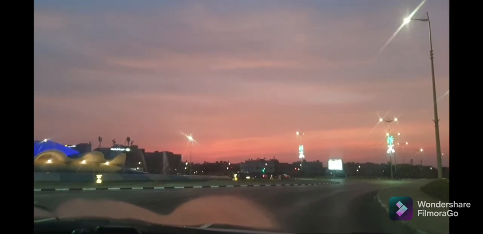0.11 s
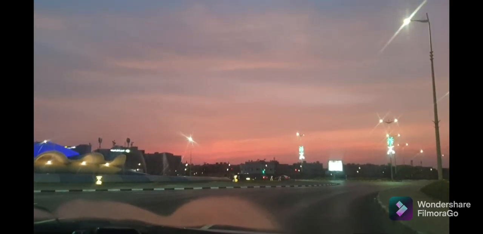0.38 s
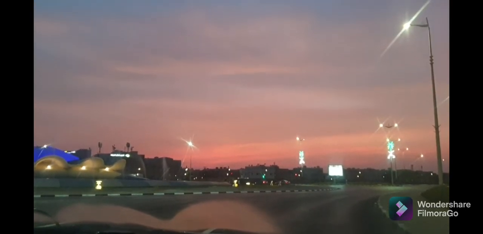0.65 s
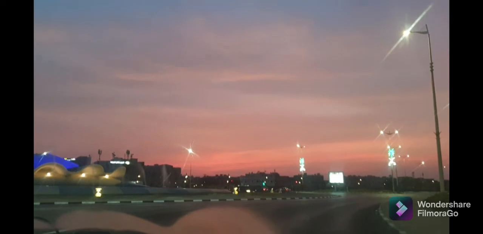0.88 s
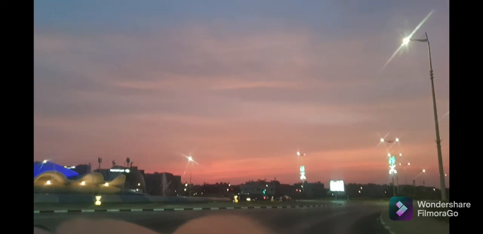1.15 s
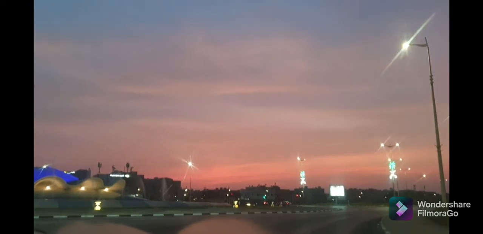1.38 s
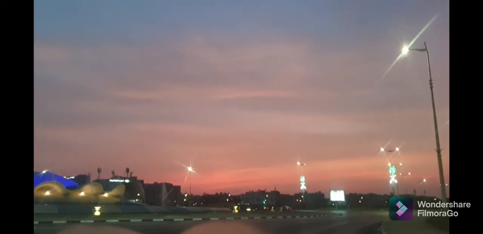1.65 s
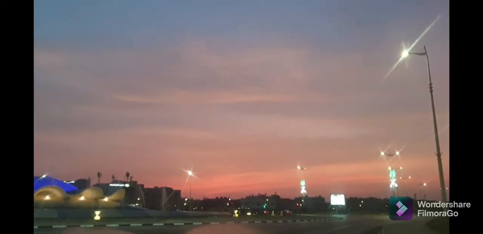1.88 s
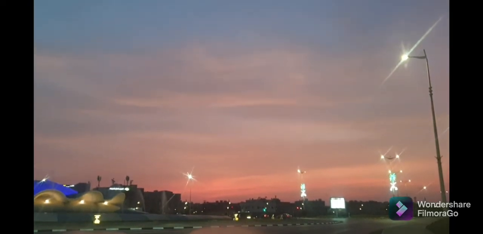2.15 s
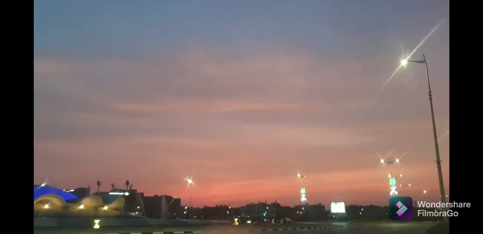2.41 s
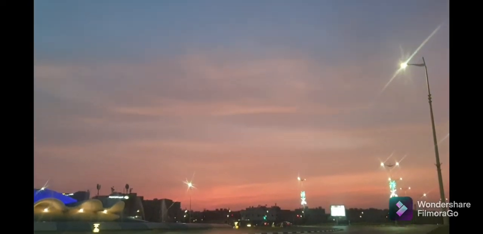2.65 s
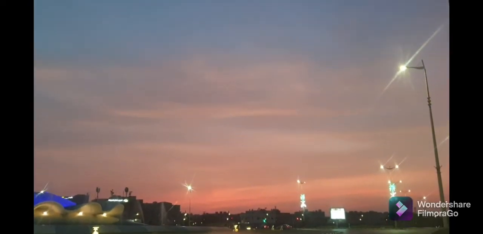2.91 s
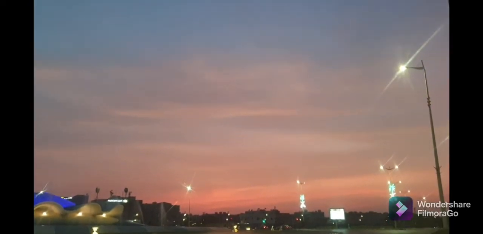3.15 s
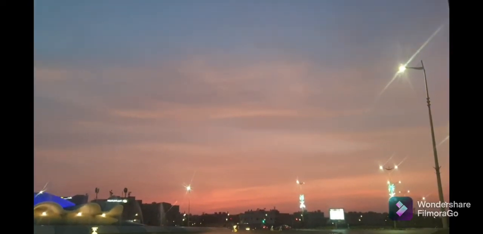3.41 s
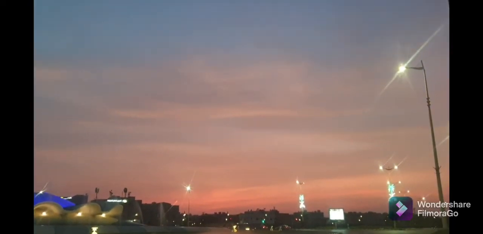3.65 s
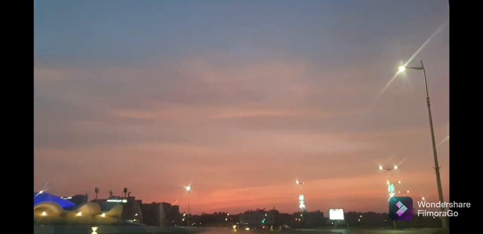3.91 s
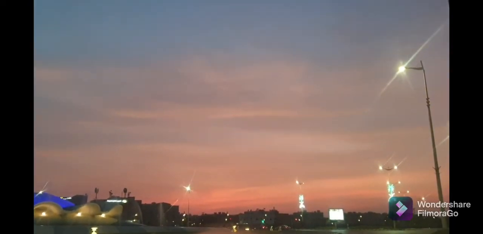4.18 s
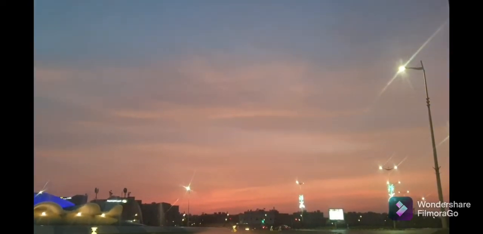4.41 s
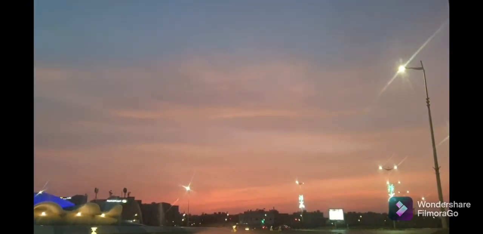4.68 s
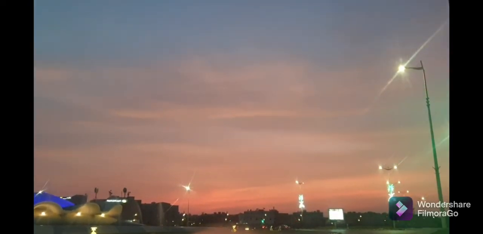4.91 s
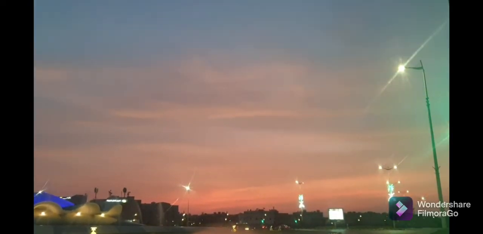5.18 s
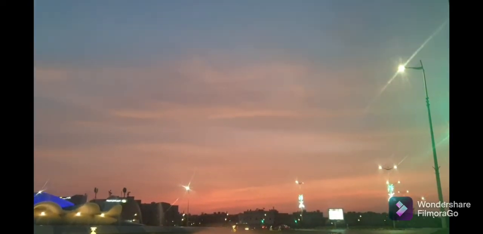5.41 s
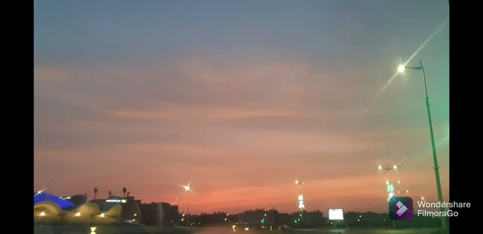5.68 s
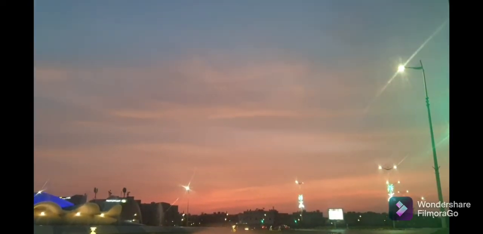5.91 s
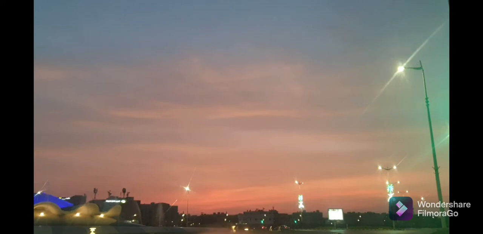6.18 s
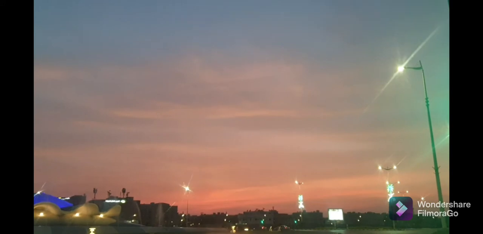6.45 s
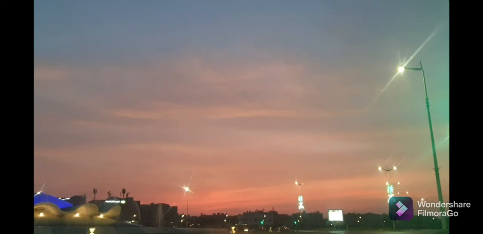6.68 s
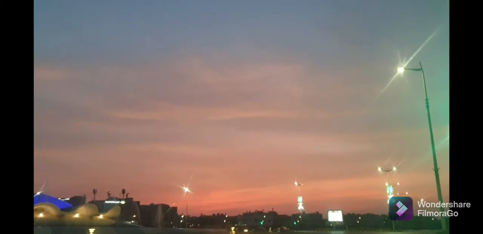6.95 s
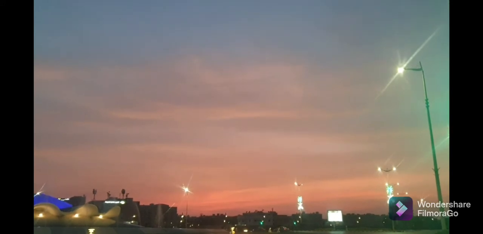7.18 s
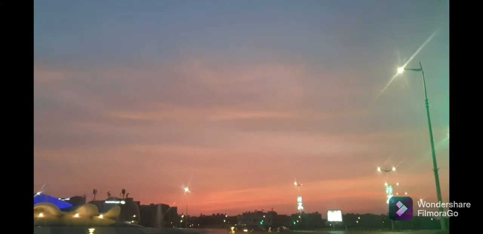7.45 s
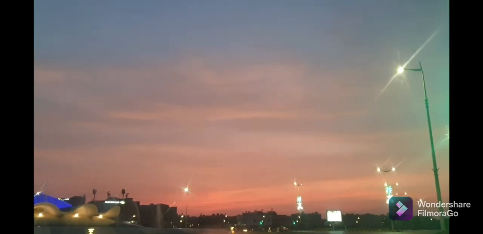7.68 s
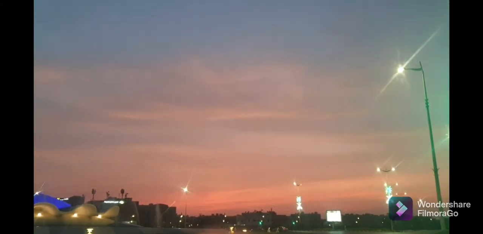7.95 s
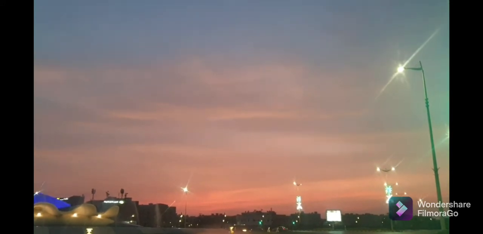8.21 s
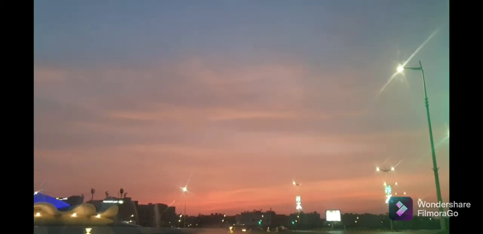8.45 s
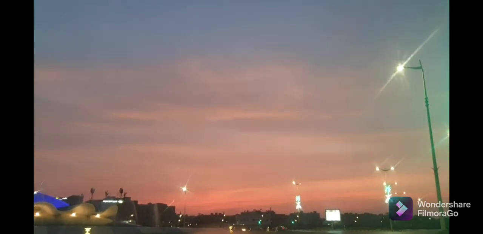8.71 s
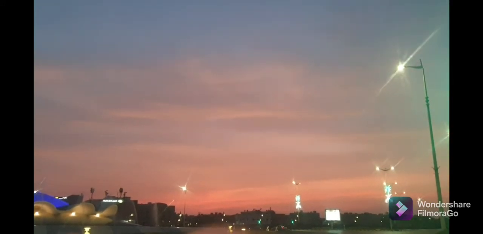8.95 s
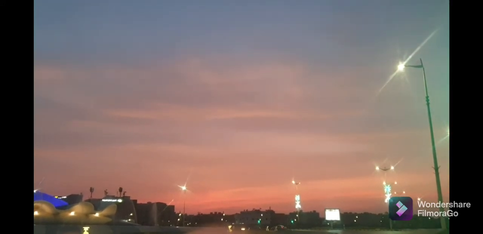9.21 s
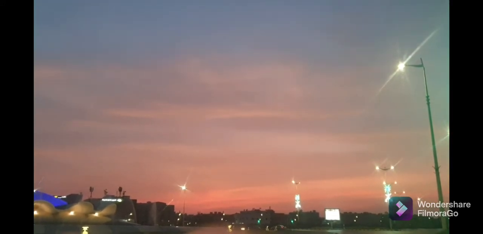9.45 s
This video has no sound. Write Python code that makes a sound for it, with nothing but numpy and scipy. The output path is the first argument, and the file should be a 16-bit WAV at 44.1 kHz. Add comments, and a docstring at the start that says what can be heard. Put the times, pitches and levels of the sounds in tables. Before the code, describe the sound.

Outdoor birdsong over low traffic wash and faint leaf hiss. Short loud buzzing chirps come first, followed by sparse, echoing far whistles and tiny twitter. Midway a distant rattle and mellow fluting lead into a close, fast, bright trill ending in a rising burr. After a lull, soft slurred whistles and stepping falling notes gather as the road swells again. Slightly gritty microphone, strong on the right, muffled and late on the left.

```python
"""Dawn chorus: over road noise, far chorus and leaf hiss, a thrush flutes and a near finch churrs, ticks and buzzes.
Whistles, seeps and twitter follow; the road swells near 4 s as a far finch rattles and the thrush returns.
The near finch trills from 4.5 s, then ticks and buzzes again; pips, warbler steps and a second road swell close.
Birds are warbled, gliding sines with noise-tail echoes; road, chorus and hiss are coloured noise.
The right microphone is open, the left one covered: faint, dull and late."""
import sys
import numpy as np
from scipy import signal
from scipy.fft import rfft, irfft, next_fast_len
from scipy.io import wavfile
from scipy.ndimage import uniform_filter1d

SR = 44100
rng = np.random.default_rng(int(sys.argv[2]) if len(sys.argv) > 2 else 0)


def persist_wave(psi):
    """Save psi, clipped to +-1, as 16-bit WAV."""
    counts = np.round(np.clip(psi, -1, 1) * 32767).astype(np.int16)
    wavfile.write(sys.argv[1], SR, np.atleast_2d(counts).T)


def magnitude_from_level(level_db):
    """Linear magnitude for a level in decibels (20 dB per decade)."""
    exponent = np.asarray(level_db, float) / 20
    return 10 ** exponent


N = 422919


def in_time(rows):
    """Columns of a table as curves, one value a sample."""
    s, *columns = np.transpose(rows)
    return [np.interp(np.arange(N) / SR, s, column) for column in columns]


def on_bins(points, size):
    """A table of frequency_hz, level_db as gains on the bins of a transform."""
    bin_hz = np.fft.rfftfreq(size, 1 / SR)
    hz, db = np.transpose(points)
    return magnitude_from_level(np.interp(np.log(bin_hz + 1), np.log(hz), db))


def drift(rate_hz, size):
    """Random wander of spread 1: noise smoothed by a one-pole lowpass at rate_hz."""
    knot_hz = 400
    knots = rng.standard_normal(int(size / SR * knot_hz) + 2)
    r = np.exp(-2 * np.pi * rate_hz / knot_hz)
    start = [r * rng.standard_normal()]
    slow = signal.lfilter([np.sqrt(1 - r * r)], [1, -r], knots, zi=start)[0]
    return np.interp(np.arange(size) * knot_hz / SR, np.arange(len(knots)), slow)


def coloured(spectrum):
    """Noise of a given spectrum, rms 1."""
    white = rng.standard_normal(N + 1)
    noise = irfft(rfft(white) * on_bins(spectrum, N + 1))[:N]
    return noise / np.std(noise)


def add_note(out, rows, warble_hz, overtone_db, flutter_db, edge_s):
    """One note: a gliding sine, warbled in pitch, with weak overtones; air and leaves make its level flutter."""
    s, hz, db, depth_hz = np.transpose(rows)
    t = np.arange(s[0], min(s[-1], (N - 1) / SR), 1 / SR)
    rate_hz = warble_hz * (1 + 0.076 * drift(65, len(t)))
    warble = np.sin(2 * np.pi * np.cumsum(rate_hz) / SR + rng.uniform(0, 2 * np.pi))
    depth_hz = np.interp(t, s, depth_hz)
    buzz = np.minimum(depth_hz / 450, 1)
    phase = 2 * np.pi * np.cumsum(np.interp(t, s, hz) + depth_hz * warble) / SR
    # the throat passes the top of each warble best
    throb = 1 + .52 * buzz * warble
    # air currents roughen the level, quickly in a buzz
    flutter = flutter_db * drift(50, len(t)) + 2.8 * buzz * drift(170, len(t))
    edges = np.clip(np.minimum(t - s[0], s[-1] - t) / edge_s, 0, 1)
    level = magnitude_from_level(np.interp(t, s, db) + flutter) * throb * edges
    # octave, a tone at 1.5 times the pitch in a buzz, and a trace of the third harmonic
    overtones = np.sin(2 * phase) + 0.94 * buzz * np.sin(3 * phase / 2) + 0.03 * np.sin(3 * phase)
    note = level * (np.sin(phase) + magnitude_from_level(overtone_db) * overtones)
    at = round(s[0] * SR)
    out[at:at + len(t)] += note[:N - at]


def sing(parts, flutter_db):
    """Each syllable is its shape, stretched and shifted in pitch, with a small chance shift."""
    out = np.zeros(N)
    for shape, sung, warble_hz in parts:
        shape = np.array([(*point, 0)[:4] for point in shape])   # a plain shape has no warble
        for s, db, pitch, length in sung:
            chance = 1 + .006 * rng.standard_normal()
            rows = shape * [length, pitch * chance, 1, 1] + [s, 0, db, 0]
            add_note(out, rows, warble_hz, overtone_db=-30, flutter_db=flutter_db, edge_s=.003)
    return out


def glide(s, span, from_hz, to_hz, db, peak_at=.35, done=.45, start_db=0, end_db=-3.5):
    """Three points of a note: start, peak, end; peak_at is a share of length, done a share of the glide."""
    peak_hz = from_hz + done * (to_hz - from_hz)
    return [(s, from_hz, db + start_db), (s + peak_at * span, peak_hz, db), (s + span, to_hz, db + end_db)]


# swells of the background: time_s, road_db, chorus_db (both before a fixed lift or flutter)
BACKGROUND = [(0.0, -71.5, -51), (0.77, -71.5, -58.5), (1.44, -72.5, -66.5), (3.12, -66.5, -66.5),
              (3.98, -55.5, -54), (5.58, -70, -55), (7.64, -71.5, -74), (8.49, -65.5, -55.5),
              (9.59, -60.5, -50.5)]


def background_swells():
    """Level curves of the road and of the far chorus."""
    return in_time(BACKGROUND)


# road spectrum: frequency_hz, relative density_db (per Hz)
ROAD = [(24, -61), (40, -32), (252, 3), (353, 3), (592, -8.5), (776, -12), (1040, 2.5), (1990, -2),
        (2330, -4), (2610, -8.5), (3420, -10), (4000, -29), (4890, -8.5), (6700, -40), (8580, -28),
        (11200, -41), (18900, -120)]


def road_noise(level_db):
    """Distant road: coloured noise that follows a level curve."""
    return magnitude_from_level(level_db) * coloured(ROAD)


# spectrum of the blurred far birds: frequency_hz, relative density_db (per Hz)
CHORUS = [(1800, -14.5), (2500, 3), (4000, 10), (6000, -10), (8000, -20), (9000, -9)]


def far_chorus(level_db):
    """Far birds blurred into coloured noise whose level flutters."""
    return magnitude_from_level(level_db + 1.78 * drift(19.0, N)) * coloured(CHORUS)


# leaf hiss spectrum: frequency_hz, relative density_db (per Hz)
AIR = [(1500, -8), (4000, 3.5), (9000, -2), (12000, 6), (16000, -16)]


def leaf_hiss(road_db):
    """Hiss of leaves: coloured noise that swells by a share of the road's swing."""
    return magnitude_from_level(-74.5 + 0.44 * (road_db - road_db.mean())) * coloured(AIR)


# short thrush notes: start_s, length_s, from_hz, to_hz, peak_db, warble_depth_hz
FLUTE_NOTES = [(0, 0.017, 3174, 2820, -26.5, 263), (.04, 0.069, 2610, 2405, -42, 30),
               (0.248, 0.059, 2656, 2087, -43, 29.5), (1.382, .1, 2386, 2934, -55.5, 180),
               (9.141, .2, 2863, 3140, -46.5, 45)]
# long thrush phrases, each a list of points: time_s, pitch_hz, level_db, warble_depth_hz
FLUTING = [
    [(3.88, 1960, -51, 29.8), (3.95, 1864, -43.5, 60.6), (4.01, 1742, -43.5, 60), (4.06, 1912, -42, 29.8),
     (4.2, 2043, -34.5, 29.6), (4.33, 2079, -42.5, 29.8), (4.355, 2228, -37.5, 30),
     (4.38, 1835, -41.5, 246), (4.46, 1686, -40, 190)],
    [(4.7, 2995, -39.5, 25), (4.78, 2910, -35.5, 25), (4.87, 2849, -40, 25), (4.91, 2622, -35, 210),
     (5.03, 2410, -45, 110)],
    [(8.61, 4700, -52, 16), (8.63, 3870, -49, 24), (8.67, 3380, -46.5, 17), (8.75, 3156, -47, 20),
     (8.82, 3506, -41.5, 30), (8.86, 4050, -42, 360), (8.96, 4870, -43, 176)],
]


def thrush():
    """Fluted sines; notes that start near 3 kHz warble fast as a burr, the others wobble more slowly."""
    out = np.zeros(N)
    short = [[(*point, depth_hz) for point in glide(*row)] for *row, depth_hz in FLUTE_NOTES]
    for note in short + FLUTING:
        warble_hz = 190 if 2600 < note[0][1] < 3200 else 40
        add_note(out, note, warble_hz, overtone_db=-40, flutter_db=1.8, edge_s=.006)
    return out


# near finch syllable shapes, before each is scaled and placed: time_s, pitch_hz, relative level_db
SLUR = [(0, 6290, -32), (.008, 5595, -1), (.018, 4816, 7), (.028, 4500, -13), (.033, 4540, -41)]
SPIKE = [(0, 3940, -5.5), (.0065, 4150, -7), (.0105, 5010, -12), (.0145, 3500, -5), (.017, 2820, -20)]
DROP = [(0, 4015, -5), (.006, 3687, 3.5), (.016, 3240, -5), (.022, 3200, -48)]
VEE = [(0, 4160, 0), (.004, 4200, -9), (.011, 4070, 2), (0.018, 3050, -10.5), (.023, 3900, 0.5),
       (0.032, 4220, -6.5), (.037, 4250, -56)]
# warbled shapes: time_s, pitch_hz, relative level_db, warble_depth_hz
CHURR = [(0, 3250, -14, -3), (.007, 3274, -7, -2), (.013, 3396, 2, 0), (.017, 3590, -8, 0),
         (.021, 3994, 1, 62), (.029, 3265, 1, 400), (.054, 2900, -1.5, 393), (.074, 2700, -7, 345),
         (.082, 2544, -41, 361)]
LONG_CHURR = [(0, 3270, -14, 6), (.007, 3290, -9, 0), (.013, 3420, 7, 2), (.017, 3580, -1, 0),
              (.021, 4000, 0, 60), (.03, 3270, -1.5, 400), (.075, 2600, -0.5, 313), (.11, 2280, -5, 192),
              (.121, 1700, -13, 102)]
TICK = [(0, 4000, 10.5, 1.5), (.008, 6800, -9.5, 194), (.018, 7600, -11, 618), (.03, 6500, -5, 901),
        (.04, 5200, 0.5, 874), (.046, 4500, -5, 919)]
TICK_UNDERTONE = [(0, 3000, -16, 17), (.012, 3600, 1, 109), (.022, 3800, -5, 205), (.032, 3530, 0, 219)]
FLOURISH = [(0, 3545, -11, 390), (.008, 3342, 0, 400), (.045, 2350, -9, 300), (.068, 2750, -9, 410),
            (.085, 3346, -0.5, 464), (.12, 3758, 0.5, 495), (.21, 4150, 0.5, 600), (.31, 4148, -5, 646),
            (.325, 4080, -7, 600)]
# ticks and flourishes as sung: start_s, level_db, pitch_factor, length_factor
TICKS = [(0.327, -37, 1.006, 0.84), (0.409, -36.5, 1.02, 0.95), (6.081, -39, 1.01, 0.86),
         (6.175, -40, 1.076, 0.86)]
FLOURISHES = [(.49, -29.5, 0.98, 1.04), (6.255, -31.5, 0.97, .98)]
# first trill, spike-drop-slur: slur_start_s, spike_db, drop_db, slur_db, slur_pitch_factor
TRIPLETS = [(4.51, -30, -34, -32, 0.95), (4.671, -25.5, -34.5, -30, 1.012), (4.835, -29.5, -27, -28, 0.98),
            (4.977, -20.5, -29, -29.5, .99), (5.119, -20, -27, -29, 0.92)]
# vee then churr: vee_start_s, vee_db, vee_end_lift_hz, churr_db, churr_length_factor
PAIRS = [(5.201, -24, 0, -31.5, 1.01), (5.363, -24.5, 3, -29, .91), (5.52, -25.5, 46, -29.5, 1.07),
         (5.688, -24.5, 457, -30.5, 0.99)]
# vee then long churr, one near the start and one ending the second trill: columns as above
LAST_PAIRS = [(.081, -25.5, 100, -30, 1.01), (5.854, -25, 300, -30, 1.01)]


def near_finch():
    """Gliding and buzzing syllables: vee and long churr, ticks and flourish, two trills, ticks and flourish."""
    churr_lag_s, spike_lead_s, drop_lead_s = .035, .055, .0305
    churr_hz, flourish_hz, tick_hz = 212.1, 178.9, 300   # mean warble rates
    spikes = [(s - spike_lead_s, db, 1, 1) for s, db, _, _, _ in TRIPLETS]
    drops = [(s - drop_lead_s, db, 1, 1) for s, _, db, _, _ in TRIPLETS]
    slurs = [(s, db, pitch, 1) for s, _, _, db, pitch in TRIPLETS]
    vees = []
    for s, db, lift_hz, _, _ in PAIRS + LAST_PAIRS:
        lifted = [(t, hz + lift_hz * (t / VEE[-1][0]) ** 2, level) for t, hz, level in VEE]
        vees.append((lifted, [(s, db, 1, 1)], 0))
    churrs = [(s + churr_lag_s, db, 1, length) for s, _, _, db, length in PAIRS]
    long_churrs = [(s + churr_lag_s, db, 1, length) for s, _, _, db, length in LAST_PAIRS]
    plain = vees + [(SLUR, slurs, 0), (SPIKE, spikes, 0), (DROP, drops, 0)]
    buzzy = [(CHURR, churrs, churr_hz), (LONG_CHURR, long_churrs, churr_hz), (TICK, TICKS, tick_hz),
             (TICK_UNDERTONE, TICKS, tick_hz), (FLOURISH, FLOURISHES, flourish_hz)]
    return sing(plain + buzzy, flutter_db=0.5)


# sharp seeps: start_s, length_s, from_hz, top_hz, peak_db
SEEPS = [(0.272, 0.025, 6000, 8080, -65), (1.045, 0.32, 5500, 7420, -53.5), (1.604, .1, 5700, 7300, -57),
         (3.499, 0.021, 6960, 8020, -39.5), (3.59, 0.047, 7200, 8580, -44.5),
         (3.79, 0.026, 6070, 8100, -38), (4.346, 0.076, 7300, 8040, -45.5),
         (4.463, 0.062, 5900, 8140, -39.5)]


def seeps():
    """Outlines that jump up in pitch, then sag and die away."""
    jump_s = .016
    return [[(s, from_hz, db), (s + jump_s, top_hz, db - 6),
             (s + max(span, 1.5 * jump_s), .94 * top_hz, db - 26)]
            for s, span, from_hz, top_hz, db in SEEPS]


# plain whistles: start_s, length_s, from_hz, to_hz, peak_db
WHISTLES = [ (0.394, 0.062, 1540, 1900, -57.5), (0.451, 0.043, 1870, 1470, -54.5),
            (.85, 0.083, 2230, 2180, -62), (0.723, 0.1, 6320, 6320, -68), (0.754, 0.17, 7500, 7170, -64),
            (1.12, 0.088, 2203, 2170, -50.5), (1.198, 0.11, 2133, 1840, -60.5),
            (1.13, 0.21, 3487, 3535, -60), (1.28, 0.059, 5070, 5080, -64.5),
            (1.498, 0.042, 4980, 5020, -65), (1.73, 0.039, 4980, 5080, -64),
            (1.755, .19, 3690, 3400, -68.5), (1.782, .09, 6880, 6880, -74),
            (1.847, 0.14, 4180, 4430, -68.5), (1.928, 0.12, 7200, 7140, -71), (2.02, .16, 3520, 3563, -61),
            (2.088, 0.24, 7030, 7220, -64), (2.144, .09, 5993, 6150, -52), (2.207, 0.27, 2850, 2900, -68),
            (2.232, 0.12, 4090, 4080, -65.5), (2.28, 0.057, 6080, 6175, -48),
            (2.37, 0.071, 5480, 5650, -64), (2.427, 0.12, 5480, 5360, -61), (2.394, 0.081, 5070, 5050, -66),
            (2.58, .12, 7300, 6900, -68), (2.6, .08, 6450, 6460, -66), (2.78, .14, 6460, 6560, -69),
            (2.935, 0.2, 7040, 6990, -67.5), (3.101, 0.2, 7380, 7180, -63), (3.15, .11, 6490, 6550, -65),
            (3.333, 0.12, 4690, 4560, -56), (7.463, 0.063, 2050, 1900, -62.5),
            (8.556, .05, 4000, 3910, -54.5), (3.294, 0.25, 7250, 7340, -52.5),
            (3.942, .05, 2450, 2400, -53.5), (4.07, 0.049, 2420, 2370, -55), (4.42, 0.26, 3520, 3500, -49),
            (4.813, 0.029, 7850, 5560, -57), (6.662, 0.06, 6080, 6060, -71),
            (6.698, 0.24, 3340, 3455, -65.5), (7.157, 0.18, 4370, 4330, -72),
            (7.28, 0.16, 2090, 1623, -62.5), (7.304, 0.072, 6600, 6530, -70),
            (7.617, 0.26, 2420, 1840, -54.5), (7.9, 0.12, 2194, 2070, -53),
            (7.929, 0.067, 1727, 1497, -53.5), (8.292, 0.1, 4370, 4330, -58), (8.32, .025, 2220, 2800, -49),
            (7.98, 0.051, 3000, 3710, -48), (8.078, 0.14, 1930, 1815, -44),
            (8.194, 0.26, 3384, 3260, -45.5), (8.221, 0.14, 1930, 1850, -52),
            (8.331, 0.081, 1850, 1440, -48.5), (8.224, 0.13, 2275, 2126, -38.5),
            (8.35, 0.21, 2170, 2142, -52), (8.508, 0.023, 4950, 4400, -44.5),
            (9.166, 0.35, 7830, 7900, -65.5), (9.342, .06, 6950, 7200, -65),
            (9.473, .07, 8000, 6500, -52.5), (9.341, 0.063, 4980, 4600, -45.5),
            (9.541, .045, 3855, 3420, -40)]


def whistles():
    """Outlines of plain glides."""
    return [glide(*row) for row in WHISTLES]


# spells of twitter: from_s, to_s, floor_db (each note is up to 8 dB louder)
TWITTER = [(1.119, 2, -76), (2.296, 2.541, -80), (2.896, 3.296, -79.5), (7.04, 7.144, -86),
           (8.099, 9.494, -78.5)]


def twitter():
    """Tiny birds high in the crowns: thin rising and falling sines near 8 kHz at random moments."""
    out = np.zeros(N)
    for first, last, floor_db in TWITTER:
        count = round((last - first) * 22)   # 22 notes a second
        for when, low, rise, span, size in rng.random((count, 5)):
            s = first + when * (last - first)
            hz = 7300 + 700 * low
            end_s, end_hz = s + 0.0185 + 0.058 * span, hz + 1100 * (rise - .3)
            db = floor_db + 8 * size
            rows = [(s, hz, db, 60), (end_s, end_hz, db, 60)]
            add_note(out, rows, warble_hz=90, overtone_db=-50, flutter_db=3, edge_s=.006)
    return out


# notes that dive or climb and level out: start_s, length_s, from_hz, to_hz, peak_db
DIVES = [(1.292, .08, 6750, 5770, -68.5), (1.961, 0.15, 6510, 5230, -59.5), (1.99, 0.13, 5460, 3960, -58),
         (2.683, 0.13, 6150, 3710, -58), (2.91, .11, 6030, 4000, -56), (3.313, 0.16, 4700, 4100, -50),
         (7.765, .13, 1888, 2262, -43)]


def dives():
    """Outlines that cover most of the glide before a knee, then level out."""
    return [glide(*row, peak_at=0.49, done=.75, start_db=-2.5, end_db=-8) for row in DIVES]


# notes that rise and fall again: start_s, length_s, top_hz, level_at_top_db
ARCHES = [(1.56, .31, 2164, -61), (5.141, 0.057, 7490, -55), (6.922, 0.2, 2430, -68.5),
          (8.017, .46, 2795, -49.5), (9.531, 0.028, 4700, -38)]


def arches():
    """Outlines whose pitch bows up to a top and down again, with a slight bow in level."""
    top_at, start_share, end_share = .38, .86, .84   # share of length, then shares of top pitch
    share = np.linspace(0, 1, num=11)
    rising = share < top_at
    bow = np.where(rising, 1 - share / top_at, (share - top_at) / (1 - top_at)) ** 2
    sag = np.where(rising, 1 - start_share, 1 - end_share)
    bow_db = bow * np.where(rising, 0.5, -1.5)
    return [np.column_stack([s + share * span, top_hz * (1 - sag * bow), db + bow_db])
            for s, span, top_hz, db in ARCHES]


# falling note of the far finch: time_s, pitch_hz, relative level_db
TRILL = [(0, 6010, -7.5), (.006, 5430, -9.5), (.013, 5000, -4.5), (.022, 4440, -10.5), (.034, 4200, -18)]


def far_finch():
    """A second finch rattles one falling note at an even pace, its level slightly uneven."""
    start_s, step_s, notes = 3.442, .0752, 12
    first_db, fade_db, uneven_db = -39.5, -0.03, 0.9   # fade is per note
    uneven = uneven_db * rng.standard_normal(notes)
    sung = [(start_s + k * step_s, first_db + k * fade_db + uneven[k], 1, 1) for k in range(notes)]
    return sing([(TRILL, sung, 0)], flutter_db=2.0)


def pips():
    """Outlines of four quick falling pips, each 40 Hz lower than the last."""
    start_s, step_s, length_s, peak_db = 7.525, .0227, .013, -48
    return [glide(start_s + k * step_s, length_s, 2900 - 40 * k, 2500 - 40 * k, peak_db) for k in range(4)]


# warbler shapes: time_s, pitch_hz, relative level_db
CASCADE = [(0, 7100, -9), (.016, 5980, -4.5), (.036, 5900, 1), (.054, 4120, 1), (.088, 3560, -1.5)]
HOOK = [(0, 7890, -5), (.013, 4280, 1.5), (.068, 4130, -6), (.108, 3300, 0.5)]
# warbler phrases as sung: start_s, level_db, pitch_factor, length_factor
CASCADES = [(8.066, -47.5, 1.026, 0.68), (8.385, -41.5, 1.014, 0.95), (8.742, -38.5, .995, .89),
            (9.405, -32, .985, 1.2)]
HOOKS = [(9.088, -36, 1.001, 1.001)]


def warbler():
    """Sines falling in steps at a steady pace, one with a held middle."""
    return sing([(CASCADE, CASCADES, 0), (HOOK, HOOKS, 0)], flutter_db=4.0)


def whistlers(depth_hz, near_flutter_db, far_flutter_db):
    """Plain notes with a slight warble; faint ones flutter more and go to the far wood."""
    near_db, far_db = -56, -58   # this loud is in near trees, this faint is deep in the wood
    near, far = np.zeros((2, N))
    for note in whistles() + pips() + dives() + arches() + seeps():
        rows = np.column_stack([note, np.full(len(note), depth_hz)])
        away = np.clip((near_db - rows[:, 2].max()) / (near_db - far_db), 0, 1)
        flutter_db = near_flutter_db + away * (far_flutter_db - near_flutter_db)
        edge_s = min(.008, (rows[-1, 0] - rows[0, 0]) / 4)
        add_note(far if away > .5 else near, rows, 69.5, overtone_db=-35, flutter_db=flutter_db, edge_s=edge_s)
    return near, far


def woods(x, early_db, early_s, late_db, late_s):
    """Scatter off trunks and leaves: two decaying noise tails, partly different at each microphone."""
    t = np.arange(SR) / SR
    early = magnitude_from_level(early_db - 60 * t / early_s) / np.sqrt(early_s)   # times are for a 60 dB fall
    late = magnitude_from_level(late_db - 60 * t / late_s) / np.sqrt(late_s)
    shared, own = rng.standard_normal((2, SR))
    noise = np.array([.6 * shared + .8 * own, shared]) / np.sqrt(SR / 14)
    tail = (early + late) * np.clip(t / .004, 0, 1) * noise
    return x + signal.fftconvolve(x[None], tail, axes=1)[:, :N]


def scene():
    """Near and far birds in the wood over road noise, a blurred far chorus and leaf hiss."""
    road_db, chorus_db = background_swells()
    near = woods(near_finch(), early_db=0, early_s=0.042, late_db=-11, late_s=0.92)
    close, distant = whistlers(depth_hz=22.0, near_flutter_db=2.0, far_flutter_db=5.0)
    middle = woods(close + warbler(), early_db=-3.5, early_s=0.21, late_db=-8.5, late_s=2.4)
    far = woods(distant + twitter(), early_db=-10.0, early_s=0.15, late_db=0.0, late_s=1.63)
    trill = woods(far_finch(), early_db=-5.0, early_s=0.22, late_db=3.5, late_s=0.92)
    fluting = woods(thrush(), early_db=-1.0, early_s=0.051, late_db=-2, late_s=1.2)
    background = road_noise(road_db + 9.5) + far_chorus(chorus_db) + leaf_hiss(road_db)
    leak = road_noise(road_db + 10)   # road noise reaching the left side by another path
    sound = near + middle + far + trill + background
    return sound + magnitude_from_level([[6], [0]]) * fluting + [[1], [0]] * leak   # the thrush sits to the left


# spectrum of the hiss that follows loudness: frequency_hz, relative density_db (per Hz)
GRIT = [(40, -0.5), (300, -2.5), (5500, -8), (7500, -10), (12000, 1), (16000, -10.5)]


def drive(dry):
    """Both microphones bend loud sounds a little and hiss more when driven."""
    rounded = .13 * np.tanh(dry / .13)
    bent = rounded + .04 * rounded ** 2   # uneven bending: an octave and a low thump under each loud note
    loudness = np.sqrt(uniform_filter1d(dry ** 2, size=400) + 1e-12)   # rms over 9 ms
    return bent + magnitude_from_level(-33.5) * loudness * coloured(GRIT)


# response of both microphones: frequency_hz, gain_db
TREBLE = [(35, -6), (55, 0.5), (8300, -0.5), (9000, -5.5), (12000, -11), (12800, -29), (15600, -24)]
# level of the covered left against the right: frequency_hz, gain_db
COVER_DB = [(60, -4), (100, -10), (180, -10.5), (310, -19.5), (530, -16), (920, -54), (1580, -24.5),
            (2730, -20), (4710, -24.5), (8130, -59)]
# phase by which the left leads (negative is late): frequency_hz, phase_rad
COVER_PHASE = [(0, 0), (260, -2.7), (860, -3.5), (1640, -6.6), (1980, -6.9), (3700, -9.0), (4130, -10.3),
               (4480, -14.6), (4740, -15.9), (5250, -16.7), (5940, -17.5), (6720, -17.4), (7240, -18.8),
               (8270, -19.2)]


def microphones(sound):
    """Filters both sides by the microphone response; the cover also dulls and delays the left."""
    size = next_fast_len(N + 2048)
    hz, lead_rad = np.transpose(COVER_PHASE)
    turn = np.exp(1j * np.interp(np.fft.rfftfreq(size, 1 / SR), hz, lead_rad))
    cover = np.array([on_bins(COVER_DB, size) * turn, np.ones(len(turn))])
    return irfft(rfft(sound, size) * cover * on_bins(TREBLE, size), size)[:, :N]


def low_pass(x):
    """Removes everything above the highest recorded frequency."""
    return signal.sosfilt(signal.butter(12, 15720, fs=SR, output="sos"), x)


def record(dry):
    """Drives the two microphones with the scene, the left one through its cover."""
    heard = microphones(drive(dry))
    return low_pass(heard)


dry = scene()
out = record(dry)
persist_wave(out)
```